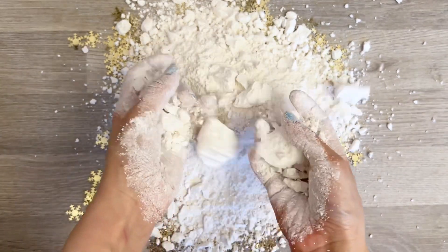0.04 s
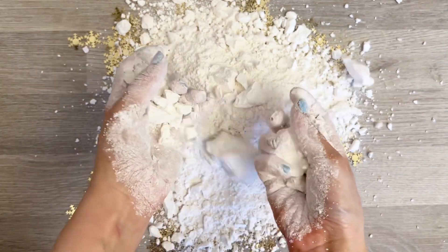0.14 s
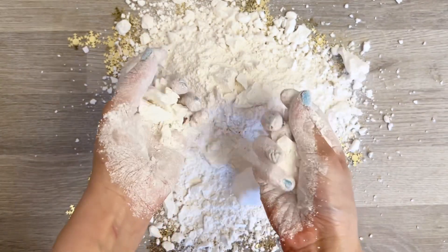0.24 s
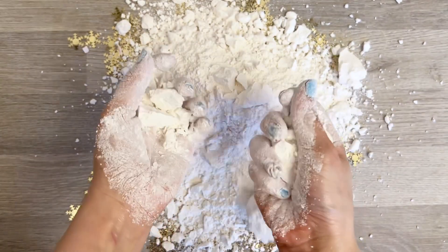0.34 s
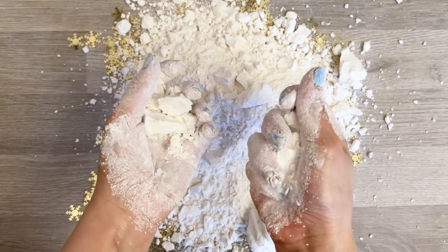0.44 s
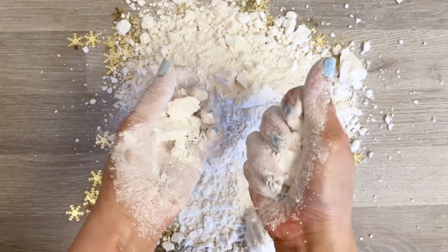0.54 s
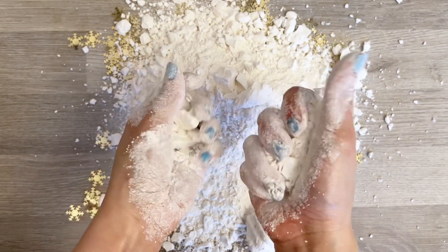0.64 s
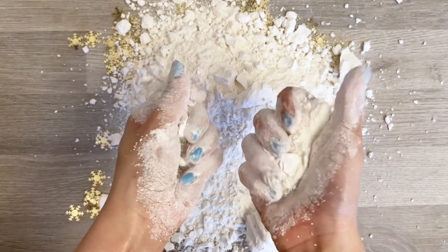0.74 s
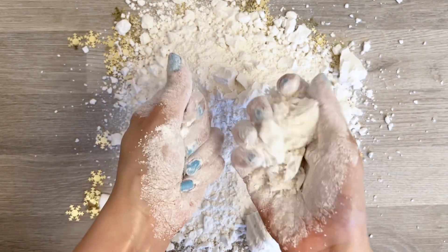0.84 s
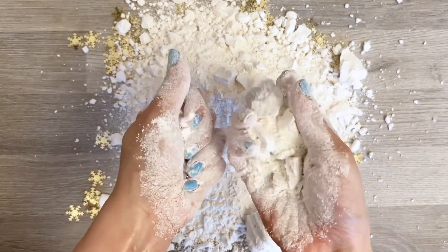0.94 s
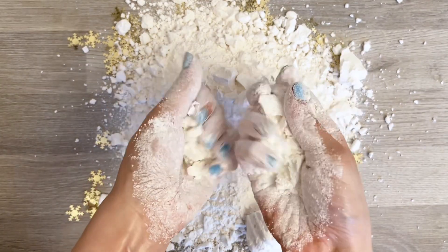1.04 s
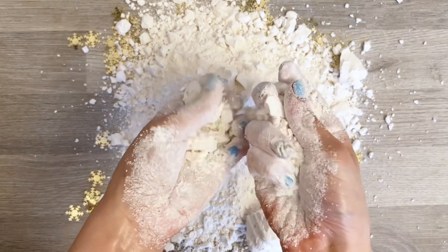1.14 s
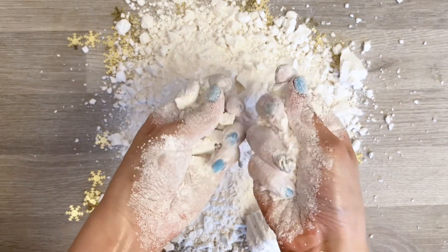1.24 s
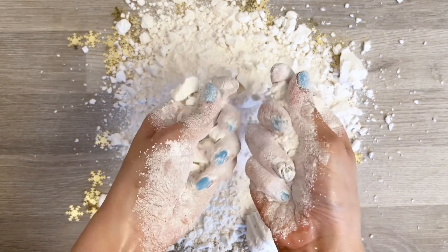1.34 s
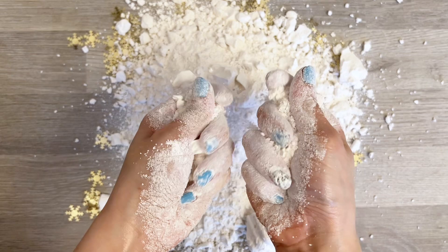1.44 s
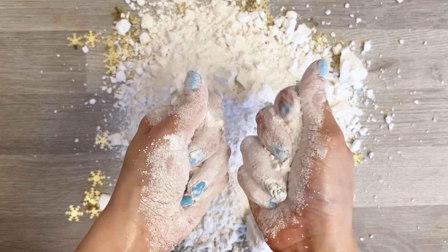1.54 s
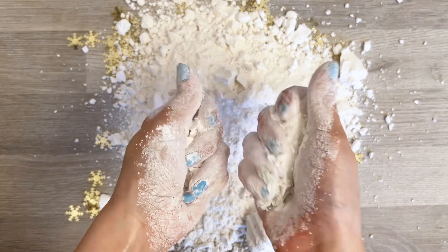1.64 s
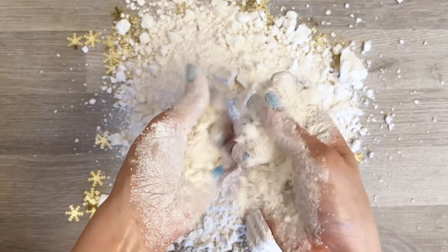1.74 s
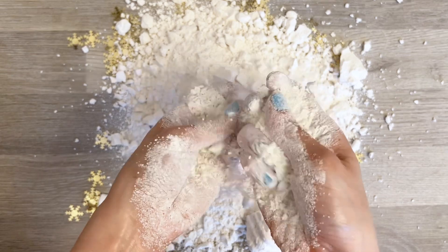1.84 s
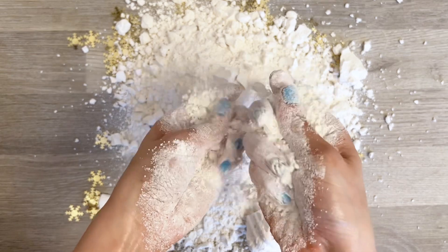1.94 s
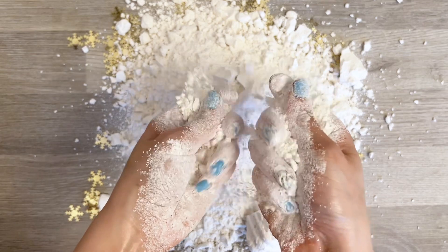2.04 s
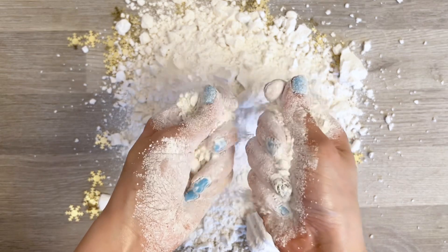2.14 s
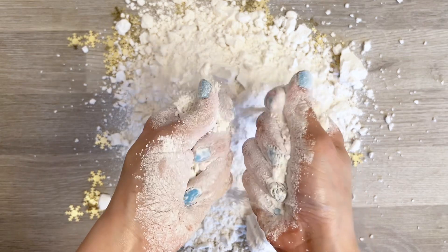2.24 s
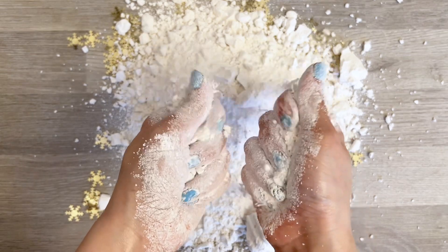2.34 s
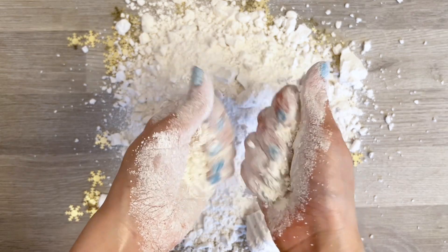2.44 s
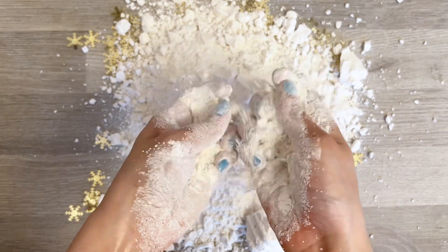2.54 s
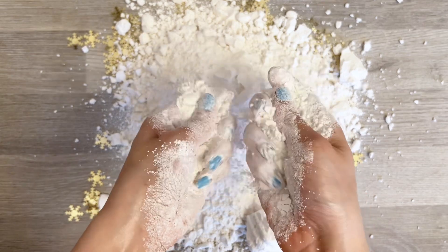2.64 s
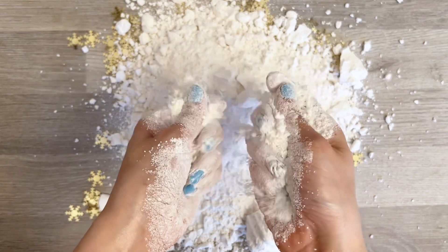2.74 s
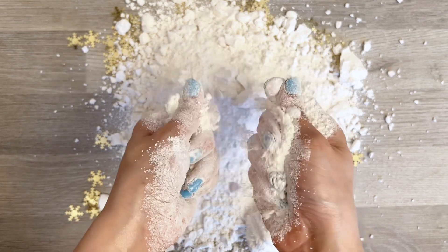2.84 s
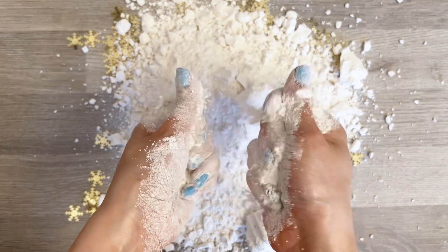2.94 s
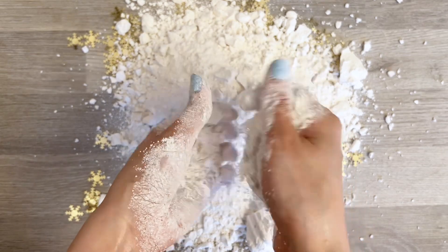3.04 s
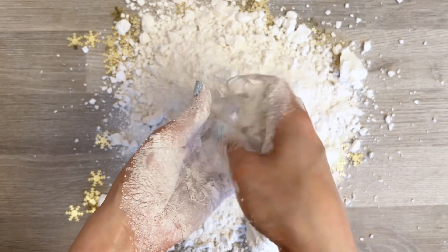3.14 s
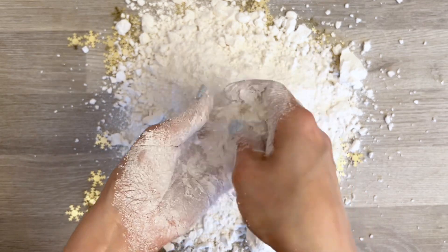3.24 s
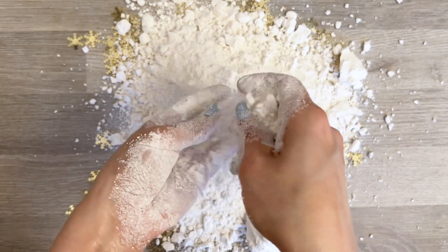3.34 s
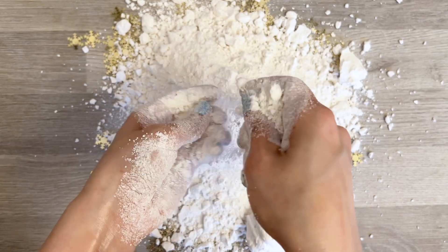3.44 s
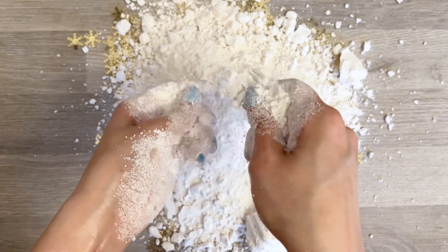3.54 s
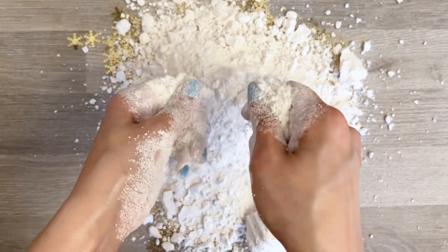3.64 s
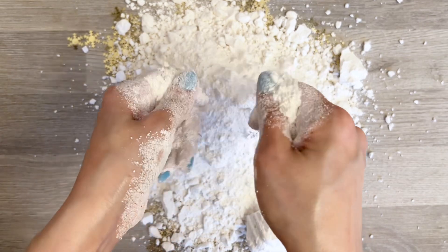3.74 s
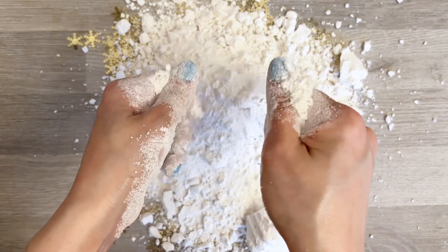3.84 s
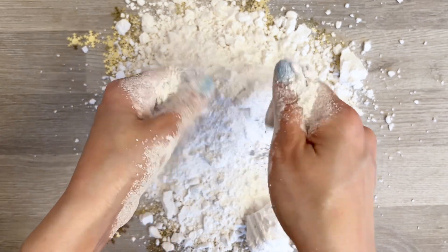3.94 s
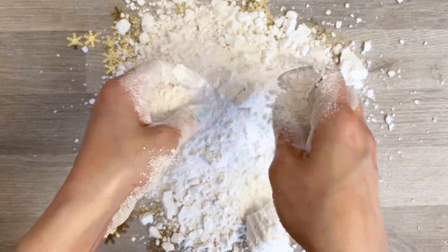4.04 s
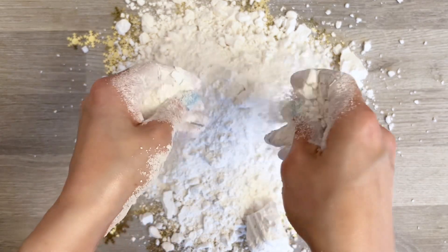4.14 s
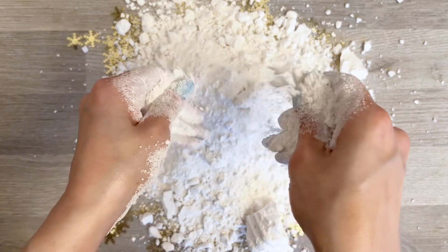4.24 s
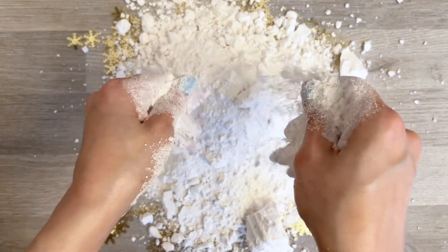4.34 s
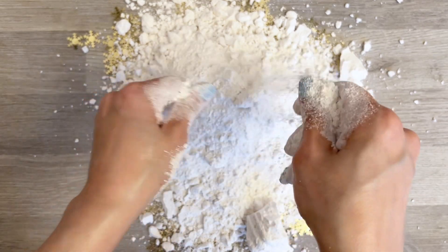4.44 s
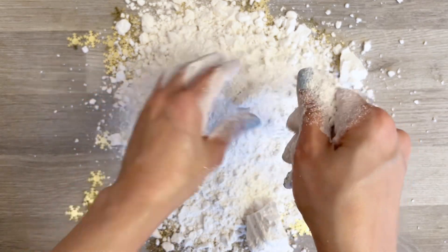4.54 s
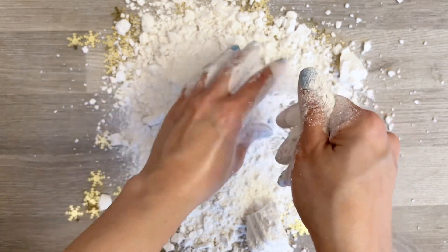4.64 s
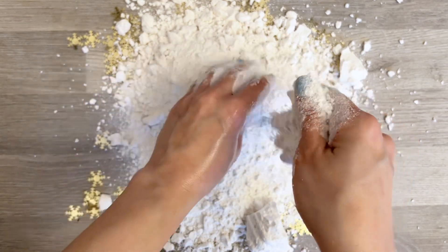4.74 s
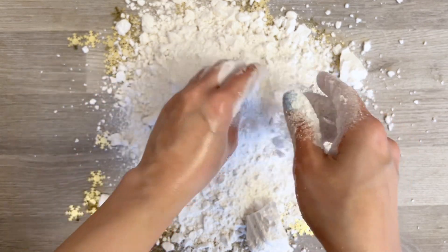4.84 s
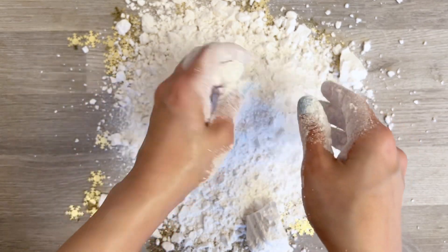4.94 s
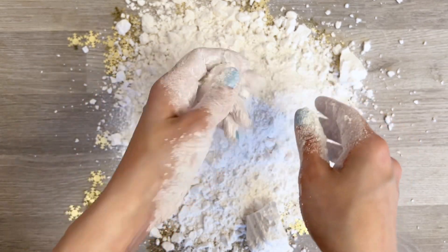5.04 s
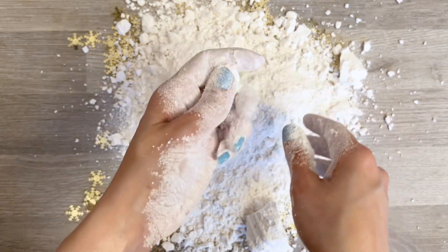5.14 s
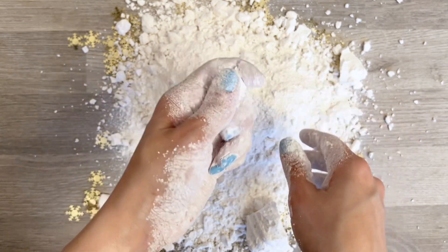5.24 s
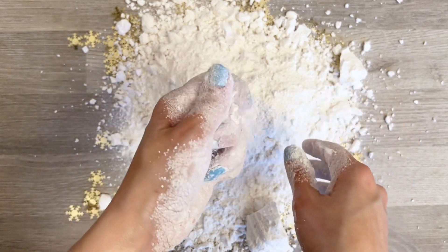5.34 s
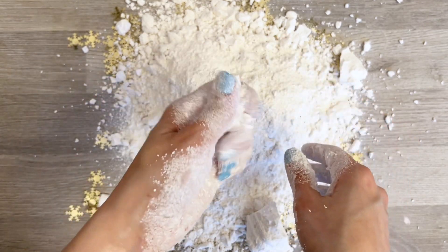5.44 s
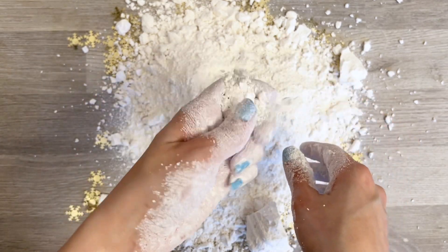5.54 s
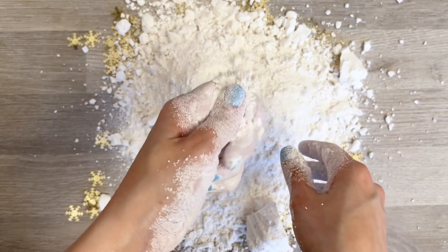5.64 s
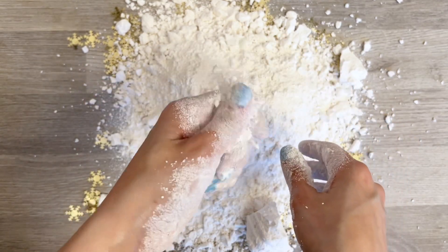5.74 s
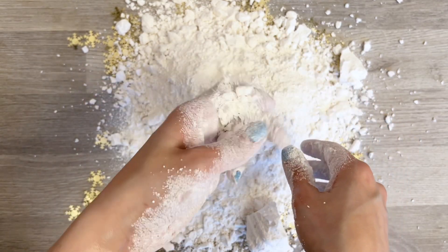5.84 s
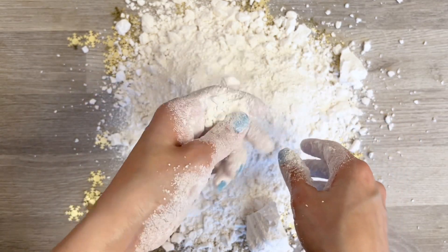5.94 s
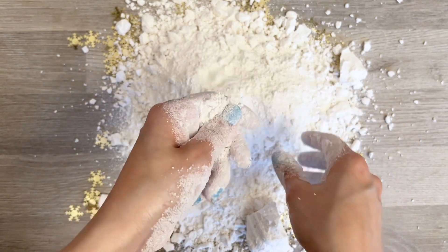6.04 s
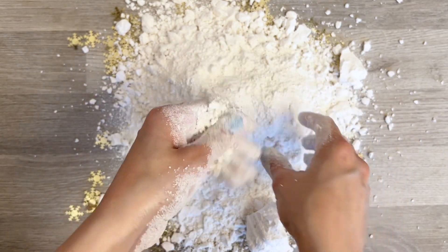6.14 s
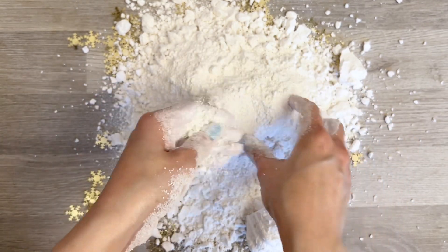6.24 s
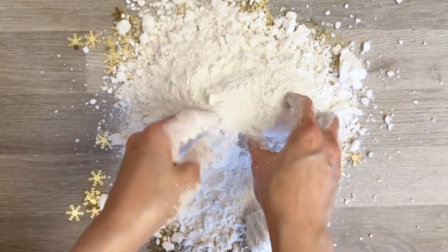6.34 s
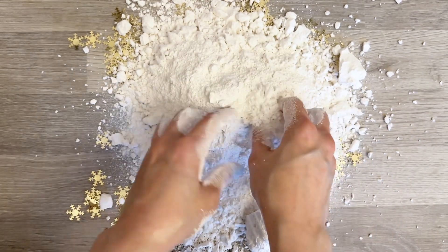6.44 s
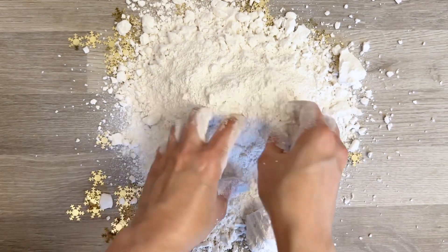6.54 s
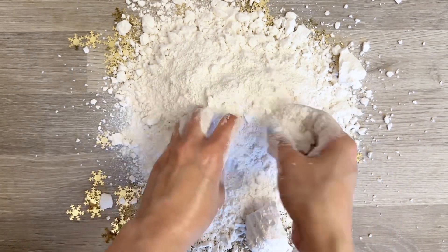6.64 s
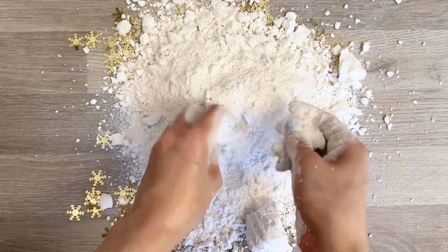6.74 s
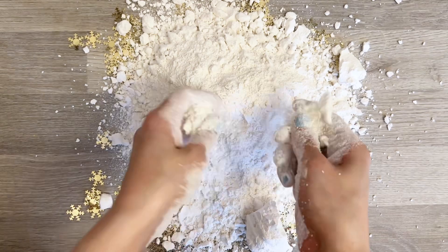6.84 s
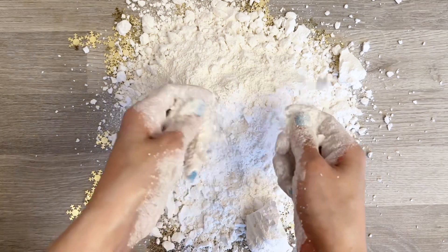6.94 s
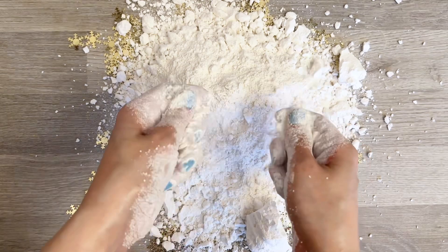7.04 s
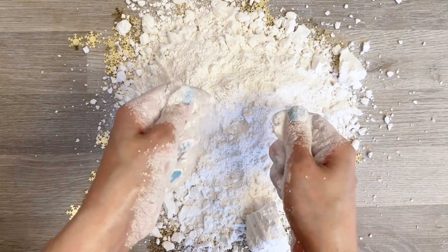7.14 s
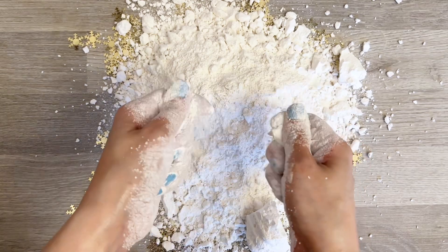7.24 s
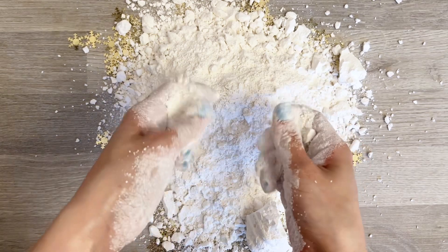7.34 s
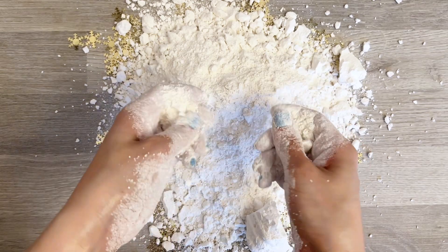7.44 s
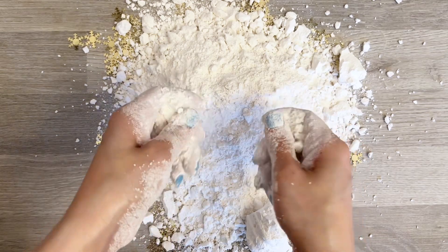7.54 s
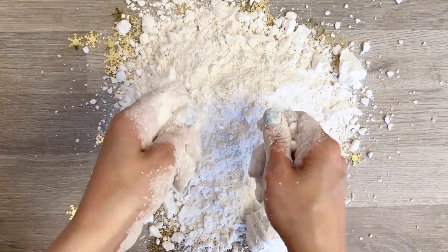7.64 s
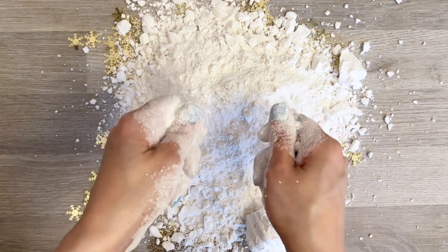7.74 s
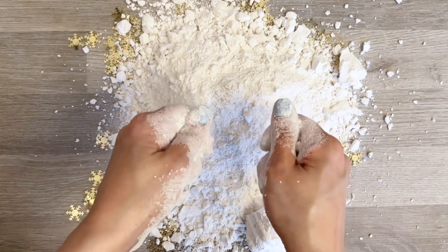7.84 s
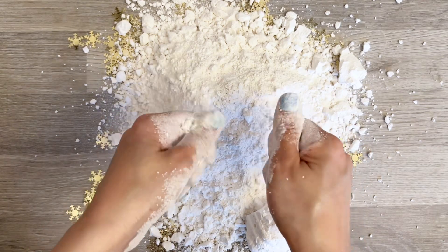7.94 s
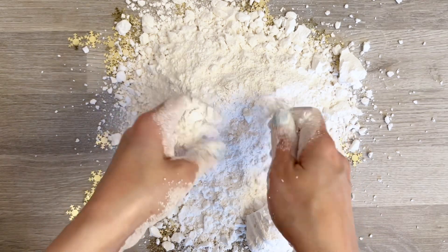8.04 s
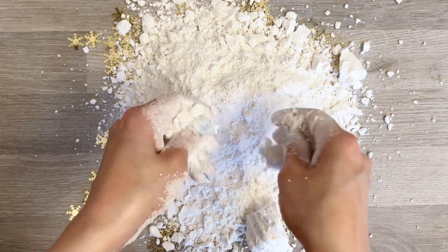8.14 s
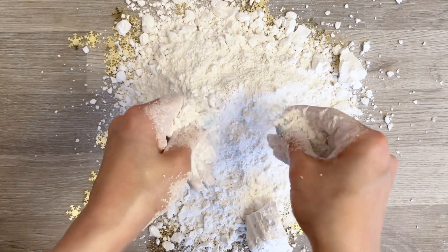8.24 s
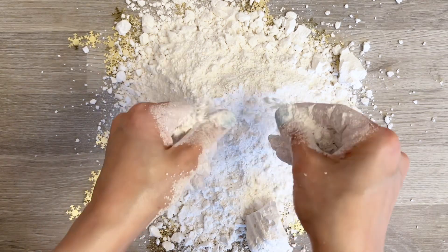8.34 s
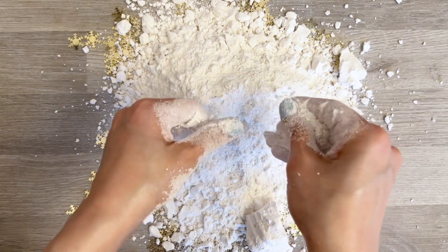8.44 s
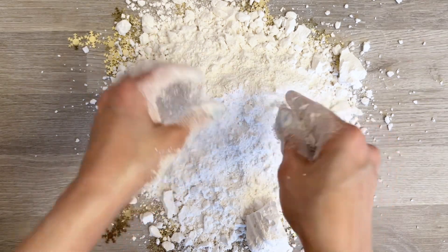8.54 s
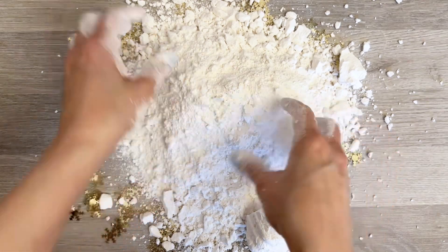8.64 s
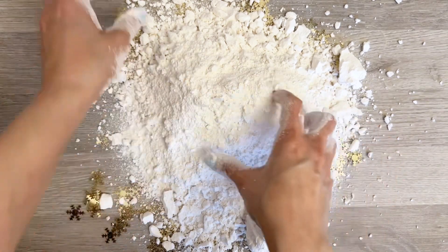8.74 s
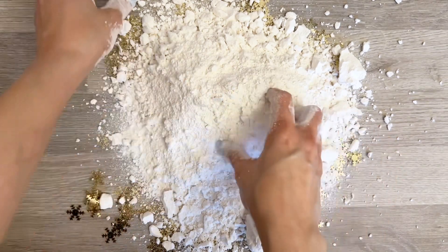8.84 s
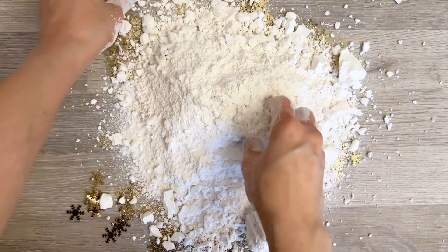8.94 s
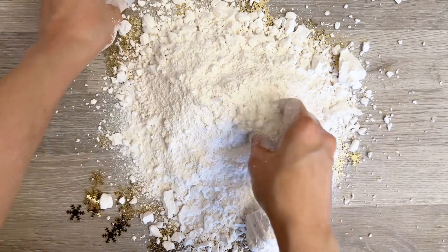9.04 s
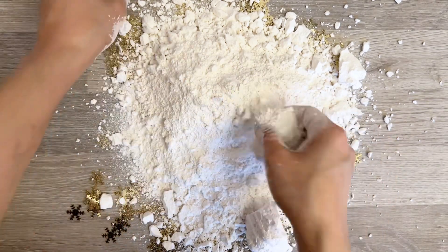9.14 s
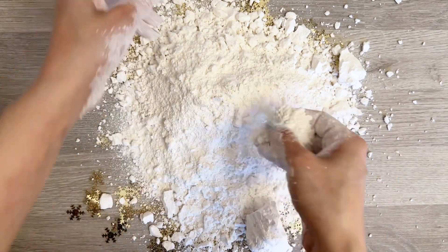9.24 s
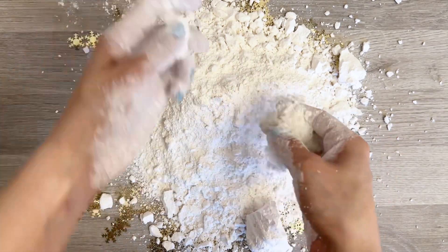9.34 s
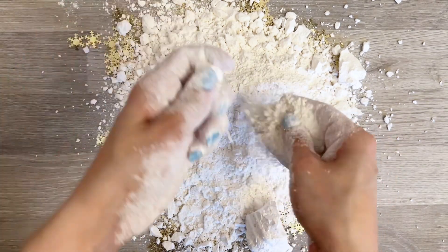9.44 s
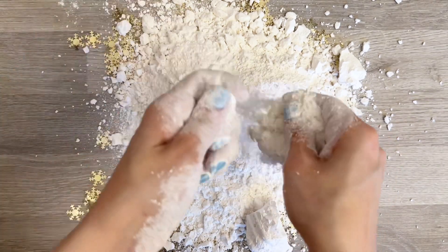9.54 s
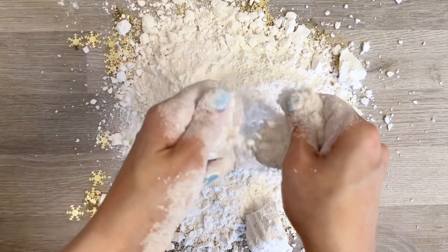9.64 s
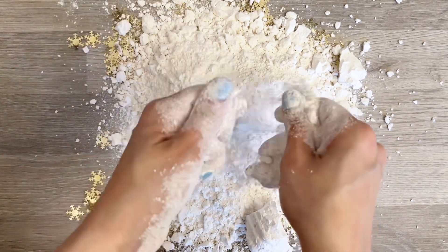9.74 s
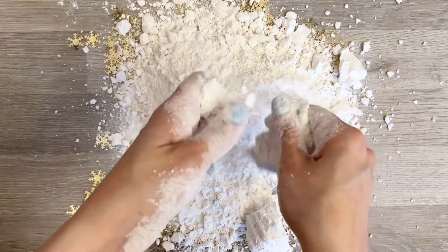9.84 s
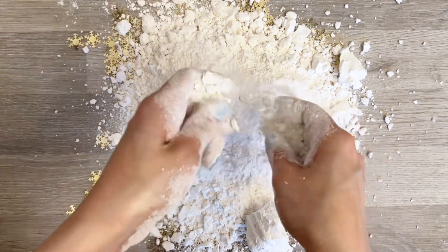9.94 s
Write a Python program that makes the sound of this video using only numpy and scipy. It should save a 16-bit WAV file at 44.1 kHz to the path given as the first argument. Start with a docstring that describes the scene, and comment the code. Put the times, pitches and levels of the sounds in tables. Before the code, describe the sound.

Chalk chunks grind and break inside two fists, heard close and dry with a short room tail. Busy crackles and sifting dust thin out into separate crunches and quiet gaps. One loud snap, fingers digging softly into powder, another loud snap, then a quieter dig and a last group of muffled pops. Low steady air rumble and a barely audible thin whine stay underneath.

```python
"""Two hands crush lumps of gym chalk over a powder heap on a table, close to a stereo microphone in a small room.
From the start fists grind crumbs (resonant grains), sift dust and press powder; lumps snap (noise-trailed pulses),
crumbs pop and bright flakes tick off (damped resonances), over soft table shoves and thuds (low noise, low resonances).
The hardest snaps come at 5.3 s and 7.7 s; fingers dig into the heap at the start, after 6.2 s and near 9 s.
A low ventilation rumble with hiss (shaped noise) and a thin whine (resonant noise) run throughout."""
import sys
import numpy as np
from scipy import signal
from scipy.fft import rfft, irfft
from scipy.io import wavfile
from scipy.ndimage import uniform_filter1d

SR = 44100
rng = np.random.default_rng(int(sys.argv[2]) if len(sys.argv) > 2 else 0)


def log_audio(samples):
    """Write samples as a 16-bit WAV file to the path given in sys.argv[1]."""
    # one column per channel
    frames = np.atleast_2d(samples).T
    # limit to full scale, then quantise
    limited = np.clip(frames, -1, 1)
    pcm = np.round(limited * 32767).astype(np.int16)
    wavfile.write(sys.argv[1], SR, pcm)


N = 440113
TIME = np.arange(N) / SR
FFT_SIZE = 466560
FREQS = np.fft.rfftfreq(FFT_SIZE, 1 / SR)

# Lumps snapping. Each row: start in s, level in dB, hollow body in dB re level, bright edge in dB re level;
# snaps() adds a fixed trim to each part.
SNAP_EVENTS = [(0.1, -14, -17, -15), (0.172, -14.5, -9.5, -20), (0.3857, -15.5, -12.5, -25),
               (.41, -15.5, -9, -21), (0.416, -12.5, -11, -11.5), (0.459, -11, -10.5, -27),
               (.591, -19.5, -6, -38), (.671, -16, -16, -24), (1.073, -23, -1, -15),
               (1.191, -19.5, -15, -26), (1.2192, -16.5, -7.5, -12.5), (1.27, -14.5, -8.5, -17),
               (1.46, -21, -3, -17), (1.498, -18, -19, -36), (1.948, -22, -19, -24),
               (2.216, -19.5, -25, -33), (3.07, -29.5, -11.5, -21), (3.602, -20.5, -7, -22.5),
               (3.636, -28.5, 5, -8), (4.305, -17.5, -7.5, -34), (4.324, -22, -5.5, -14),
               (4.557, -16, -11.5, -13.5), (5.19, -27.5, -14, -20), (5.302, -2.5, -12.5, -19),
               (5.984, -29.5, -1, -5), (6.008, -18.5, -1.5, -12), (6.75, -22, -28, -21),
               (6.813, -20, -12, -11.5), (6.834, -23.5, -11, -18), (7.0055, -16.5, -31, -25),
               (7.051, -16.5, -29, -37), (7.586, -16, -8, -13.5), (7.616, -21.5, -7.5, -26),
               (7.695, -2.5, -23, -27), (7.721, -21, -14, -25), (7.769, -21.5, -13, -17),
               (7.796, -24.5, -13, -12), (8.272, -27, -22, -14), (9.434, -24, -7.5, -9),
               (9.449, -22, -14, -9), (9.5715, -20, -6, -12), (9.977, -17.5, -8.5, -11.5)]


def from_db(db):
    """Decibels to amplitude gain."""
    return 10 ** (np.asarray(db) / 20)


def rms_one(x):
    """Scale to unit rms."""
    return x / np.sqrt(np.mean(x ** 2) + 1e-20)


def at_freqs(points):
    """Interpolate (Hz, value) points over log frequency."""
    hz, value = np.transpose(points)
    return np.interp(np.log(FREQS + 1), np.log(hz), value)


def filtered(x, response):
    """Apply a frequency response."""
    return irfft(rfft(x, FFT_SIZE) * response)[..., :N]


def coloured(x, spectrum):
    """Minimum-phase filter following (Hz, dB) points: no ringing ahead of an event."""
    cepstrum = irfft(np.log(from_db(at_freqs(spectrum))))
    # fold the cepstrum onto positive time
    cepstrum[1:FFT_SIZE // 2] *= 2
    cepstrum[FFT_SIZE // 2 + 1:] = 0
    return filtered(x, np.exp(rfft(cepstrum)))


def band(x, low_hz, high_hz):
    """Gentle Butterworth band-pass."""
    sos = signal.butter(2, [low_hz, min(high_hz, SR / 2 - 1)], "band", fs=SR, output="sos")
    return signal.sosfilt(sos, x)


def resonate(x, hz, width_hz):
    """Two-pole resonance with gain near 1 at its peak."""
    r = np.exp(-np.pi * width_hz / SR)
    zeros = np.array([1, 0, -1]) * (1 - r * r) / 2
    poles = [1, -2 * r * np.cos(2 * np.pi * hz / SR), r * r]
    return signal.lfilter(zeros, poles, x)


def resonate_twice(x, hz, first_width_hz, second_width_hz):
    """Two resonances in series at one pitch: softer onset, steeper skirts."""
    return resonate(resonate(x, hz, first_width_hz), hz, second_width_hz)


def drift(per_s):
    """Random curve: normal draws at per_s points a second, joined by straight lines."""
    return np.interp(TIME * per_s, np.arange(N), rng.standard_normal(N))


def snaps(lead_s=0.0011, run_s=0.0033, run_db=0.0, debris_s=0.011, debris_db=-26,
          core_db=-2.5, body_db=-6.5, edge_db=-1, size=3000):
    """A crack creeps in, parts the lump with one sharp pulse, runs on for a moment and sheds debris."""
    # Hollows of the cupped hands. Each row: resonance in Hz, width in Hz, gain in dB.
    hollows = [(1410, 960, 15), (2180, 940, 13.5), (2680, 440, 14), (4570, 13000, -18)]
    # Colour of the bright edge. Each row: frequency in Hz, gain in dB.
    edge_colour = [(2500, -66), (5000, -6.5), (7500, -1), (10500, -3), (12000, -4), (16000, -46)]
    before_s, delay_s = 0.005, 0.0012   # room for the lead-in; main pulse after the row's start
    t = np.arange(size) / SR - before_s
    main = signal.unit_impulse(size, np.argmin(np.abs(t)))
    running = np.exp(-np.abs(t) / np.where(t < 0, lead_s, run_s))
    crumbling = (t > 0) * np.exp(-np.abs(t) / debris_s)

    def in_hand(x):
        # the hand has a slightly different shape at every snap
        detuned = [(hz * np.exp(0.049 * rng.standard_normal()), width, db) for hz, width, db in hollows]
        return sum(resonate(x, hz, width) * from_db(db) for hz, width, db in detuned)

    def burst(x):
        # unit rms if spread over 4 ms
        return x / np.linalg.norm(x) * np.sqrt(0.004 * SR)

    knocks, edges = np.zeros((2, N + size))
    for s, level_db, hollow_db, bright_db in SNAP_EVENTS:
        splinters = rng.standard_normal((4, size))
        splinters *= np.abs(splinters)   # a few large ones among many small
        cracks = splinters[:3] * running
        core, body, edge = [main + from_db(run_db) * x / np.linalg.norm(x) for x in cracks]
        core = band(in_hand(core), 1740, 6500)
        knock = from_db(core_db) * core / np.abs(core).max()
        knock += from_db(hollow_db + body_db) * burst(band(body, 737, 1490))
        knock += from_db(debris_db) * burst(in_hand(splinters[3] * crumbling))
        at = round((s + delay_s - before_s) * SR)
        knocks[at:at + size] += from_db(level_db) * knock
        edge = band(edge, 3600, 13500)
        edges[at:at + size] += from_db(level_db + bright_db + edge_db) * burst(edge)
    return knocks[:N] + coloured(edges, edge_colour)[:N]


def chips(width_hz=1700, overtone=1.72, overtone_db=-13, size=600):
    """A flake rings for a few cycles at a pitch set by its size, with one fainter overtone."""
    # Hard flakes splitting off. Each row: start in s, pitch in Hz, peak in dB.
    flakes = [(0.4588, 4900, -10), (1.137, 7600, -18), (5.303, 8500, -4.5), (7.696, 6200, -5),
              (9.2681, 8580, -20)]
    out, click = np.zeros(N), signal.unit_impulse(size)
    for s, hz, peak_db in flakes:
        tick = resonate_twice(click, hz, 2 * width_hz, 2 * width_hz)
        upper = resonate_twice(click, overtone * hz, 2 * width_hz, 2 * width_hz)
        tick = tick + from_db(overtone_db) * upper
        out += np.pad(from_db(peak_db) * tick / np.abs(tick).max(), (round(s * SR), N))[:N]
    return out


def pops(rows, sharpness=1.16, after_db=-3, after_s=0.0022, level_db=-2.0, size=2000):
    """A crumb bursts inside the fist: a break and a ragged run of smaller ones, muffled to a pitch set by its size."""
    out = np.zeros(N + size)
    dying = np.exp(-np.arange(size) / SR / after_s)
    for s, hz, row_db in rows:
        run = rng.standard_normal(size)
        run *= np.abs(run) * dying
        breaks = signal.unit_impulse(size) + from_db(after_db) * run / np.linalg.norm(run)
        pop = resonate_twice(breaks, hz, hz / sharpness, hz / sharpness)
        at = round(s * SR)
        out[at:at + size] += from_db(row_db + level_db) * pop / np.abs(pop).max()
    return out[:N]


def stray_pops(grip, per_s=22, level_db=-3.0, follows=0.61, spread_db=3.0, pitch_hz=1750, spread_octaves=0.38):
    """Small crumbs give way at random, louder under a hard grip: rows of start s, pitch Hz, level dB for pops()."""
    chance = rng.standard_normal((400, 2))
    times = np.cumsum(rng.exponential(1, len(chance))) / per_s
    rows = []
    for s, (pitch, strength) in zip(times, chance):
        if s < TIME[-1]:
            grip_db = 20 * np.log10(grip[int(s * SR)])
            row_db = level_db + follows * grip_db + spread_db * strength
            rows.append((s, pitch_hz * 2 ** (spread_octaves * pitch), row_db))
    return rows


def stroke(at_s, build_s, release_s, shape=2.19):
    """Pressure builds to 1 and lets go; 1/e after the build or release time; shape 1 is pointed, 2 rounded."""
    near = slice(*np.searchsorted(TIME, [at_s - 6 * build_s, at_s + 6 * release_s]))
    t, swell = TIME[near] - at_s, np.zeros(N)
    swell[near] = np.exp(-np.maximum(-t / build_s, t / release_s) ** shape)
    return swell


def handwork():
    """Gains over time of large- and small-hollow crumbs, dust, powder and scrape; strokes add in power."""
    # A fist closes on chalk. Each row: hardest grip in s, build in s, release in s, crumbs in dB, dust in dB,
    # powder in dB, tightness as small hollow in dB re large. squeezing() trims dust and powder.
    grips = [(.08, 0.25, 0.4, -51.5, -42, -43, -18), (.25, 0.021, 0.094, -42.5, -58.5, -66, 13),
             (.44, 0.041, 0.053, -44.5, -44, -38, 1), (0.609, 0.27, 0.12, -43, -45, -46, 7),
             (.88, 0.16, 0.18, -46, -45.5, -53.5, -13), (1.07, 0.064, 0.04, -39, -47.5, -48.5, 4),
             (1.26, 0.12, 0.16, -41, -43, -45.5, 0), (1.49, 0.16, 0.1, -38.5, -41.5, -43, -6.5),
             (1.76, 0.22, 0.046, -47.5, -52, -57, 2), (1.94, 0.11, 0.33, -40, -46.5, -43.5, -1),
             (2.07, 0.15, 0.19, -41, -60, -45, -18), (2.331, 0.18, 0.053, -44, -45.5, -59, -7),
             (2.499, 0.16, 0.13, -45.5, -48.5, -64, 2), (2.66, 0.078, 0.25, -42, -50, -51.5, -4),
             (2.701, 0.013, 0.03, -39, -61, -44, 0), (2.89, 0.05, 0.085, -46.5, -45, -52.5, -6),
             (3.3, 0.073, 0.075, -45, -53.5, -52.5, -3), (3.44, 0.077, 0.14, -46.5, -56.5, -50.5, -4),
             (3.668, 0.073, 0.061, -43.5, -49, -40, -3), (3.82, 0.14, 0.068, -46.5, -49, -61, -2),
             (4.2, 0.11, 0.12, -45, -52, -55, -0.5), (4.44, 0.062, 0.11, -53, -51, -59, 20),
             (4.564, 0.0065, 0.026, -46, -43, -45, 5), (5.278, 0.025, 0.081, -44, -49.5, -44.5, 18),
             (5.634, 0.049, 0.074, -39.5, -49, -54, 5), (5.78, 0.014, 0.013, -50, -59, -70, 22),
             (5.995, 0.053, 0.065, -40.5, -51, -48.5, 24), (6.824, 0.019, 0.015, -38, -43, -59, 6),
             (6.8, 0.16, 0.22, -51, -54, -60, 21), (7.02, 0.022, 0.051, -42, -58, -43, 4),
             (7.15, 0.28, 0.15, -48, -59, -70, -3), (7.585, 0.023, 0.034, -39.5, -46, -43.5, 4),
             (7.76, 0.24, 0.25, -50.5, -50, -58, 6), (8.18, 0.051, 0.14, -48, -52.5, -63, 6),
             (8.328, 0.024, 0.091, -48, -49, -54.5, 2), (9.445, 0.063, 0.21, -45.5, -46.5, -59, 5),
             (9.622, 0.052, 0.037, -40.5, -44, -46, -5), (9.8, 0.17, 0.092, -49, -48.5, -70, 11)]
    # Fingers dig into the heap. Each row: deepest push in s, build in s, release in s, powder in dB, scrape in dB.
    pushes = [(.09, .05, 0.05, -46, -46.5), (6.262, .016, 0.041, -48, -50), (6.374, .07, 0.071, -40, -48),
              (6.475, 0.037, 0.056, -50, -51), (6.665, 0.062, 0.039, -46, -48),
              (8.95, 0.12, 0.077, -42.5, -50.5), (8.987, 0.023, 0.021, -45, -39.5)]
    # Loosened fingers let dust trickle. Each row: middle in s, half length to 1/e in s, dust in dB.
    dribbles = [(3.093, 0.3, -56), (3.985, 0.043, -45.5), (4.925, 0.035, -49.5), (5.475, 0.025, -48.5),
                (5.812, 0.25, -53), (6.164, 0.012, -51.5), (7.321, 0.051, -50.5), (8.5, 0.041, -47),
                (8.989, 0.028, -43.5)]
    # chalky hands are never quite still
    rest_crumbs_db, rest_dust_db, rest_powder_db = -69.5, -62, -62.5
    # every snap spills dust: dB at a 0 dB snap, dB per dB of snap level
    spill_db, spill_growth, spill_rise_s, spill_s = -50, 0.2, 0.004, 0.048

    rest_db = (rest_crumbs_db, rest_crumbs_db, rest_dust_db, rest_powder_db, -np.inf)
    large, small, dust, powder, scrape = [np.full(N, from_db(db) ** 2) for db in rest_db]
    for s, build_s, release_s, crumbs_db, dust_db, powder_db, tight_db in grips:
        effort = stroke(s, build_s, release_s) ** 2
        open_share = 1 / (1 + from_db(tight_db) ** 2)
        large += effort * (from_db(crumbs_db) ** 2 * open_share)
        small += effort * (from_db(crumbs_db) ** 2 * (1 - open_share))
        dust += effort * from_db(dust_db) ** 2
        powder += effort * from_db(powder_db) ** 2
    for s, build_s, release_s, powder_db, scrape_db in pushes:
        effort = stroke(s, build_s, release_s) ** 2
        powder += effort * from_db(powder_db) ** 2
        scrape += effort * from_db(scrape_db) ** 2
    for s, length_s, dust_db in dribbles:
        dust += (from_db(dust_db) * stroke(s, length_s, length_s)) ** 2
    for s, level_db, _, _ in SNAP_EVENTS:
        spill = stroke(s + spill_rise_s, spill_rise_s, spill_s)
        dust += (from_db(spill_db + spill_growth * level_db) * spill) ** 2
    return np.sqrt([large, small, dust, powder, scrape])


def avalanches(per_s=80, size_db=6, die_s=0.0022):
    """Now and then a crumb collapses and sets off a short run of larger fractures: a gain over time."""
    sizes = from_db(size_db * np.minimum(rng.exponential(1, N), 1.8))
    starts = (rng.random(N) < per_s / SR) * sizes
    return 1 + signal.lfilter([1], [1, -np.exp(-1 / (die_s * SR))], starts)


def grains(per_s, spread_db, surge, sharpness, low_hz, high_hz, count=9):
    """Tiny fractures, each a short ring at one of count pitches; the slow level is evened out."""
    born = rng.random(N) < per_s / SR
    sizes = from_db(spread_db * np.minimum(rng.exponential(1, N), 4))
    clicks = born * surge * sizes * rng.choice([-1, 1], N)
    dealt = rng.integers(0, count, N)
    faint = 1e-9 * rng.standard_normal(N)   # keeps the filters from pure silence
    pitches = np.geomspace(low_hz, min(high_hz, SR / 2 - 1), count)
    out = sum(resonate(clicks * (dealt == k) + faint, hz, hz / sharpness) for k, hz in enumerate(pitches))
    return out / np.sqrt(np.abs(uniform_filter1d(out ** 2, size=3600)) + 1e-12)


def two_hands(stream, spectrum, apart_db=3, count=0):
    """Each hand makes its own grains, louder by apart_db and count samples earlier on its own side; rms 1."""
    one = coloured(stream, spectrum)
    one = np.array([one, np.roll(one, count)]) * from_db(apart_db * np.array([[1], [-1]]) / 2)
    other = np.roll(one, N // 2, axis=1)[::-1]   # half the length away, sides swapped
    return rms_one(one + other)


def squeezing(loose, tight, sifting, pressing, scraping, fits_per_s=35, fits_db=2.5):
    """Crumbs grind in the fists, dust sifts out, and the heap gives way under the fingers."""
    # Grain colours. Each row: frequency in Hz, relative density in dB per Hz.
    crumb_colour = [(150, -45), (400, -4.5), (720, -9), (1000, 0), (1900, -6.5), (2600, -5), (3400, -11),
                    (6000, -20.5), (9000, -20), (16000, -67)]
    dust_colour = [(600, -48), (2000, 9.5), (3500, 4.5), (8500, 1), (10500, -6), (15800, -4), (16500, -36)]
    powder_colour = [(50, -26), (110, -3.5), (200, -4), (450, -5), (750, -11.5), (1300, -36), (3000, -39),
                     (8000, -66)]
    scrape_colour = [(300, -8), (600, 1), (1100, 2), (1800, -5), (3000, -12), (6000, -29)]
    surge = avalanches()
    coarse = grains(per_s=1100, spread_db=3.5, surge=surge, sharpness=1.7, low_hz=578, high_hz=3180, count=6)
    coarse = two_hands(coarse, crumb_colour, count=2)
    # a closing fist shrinks its hollow and grinds finer, so the crunch gets denser and moves up in pitch
    fine = grains(per_s=1900, spread_db=2.5, surge=surge ** 0.88, sharpness=1.6, low_hz=1140, high_hz=6100, count=5)
    fine = two_hands(fine, crumb_colour, count=2)
    large = rms_one(band(coarse, 225, 1640))
    small = rms_one(band(fine, 1500, 8700))
    # chalk gives way in fits and starts
    crumbs = (loose * large - tight * small) * from_db(fits_db * drift(fits_per_s))
    dust = grains(per_s=5000, spread_db=1.0, surge=surge ** 0.84, sharpness=2.5, low_hz=2030, high_hz=13800)
    dust = two_hands(dust, dust_colour)
    powder = grains(per_s=700, spread_db=4.5, surge=np.sqrt(surge), sharpness=2.1, low_hz=81.7, high_hz=1950)
    powder = two_hands(powder, powder_colour, count=6)
    # loose crumbs slide under the digging fingers without breaking, so they rub evenly
    scrape = grains(per_s=2700, spread_db=5.0, surge=1, sharpness=3.1, low_hz=420, high_hz=2960)
    scrape = two_hands(scrape, scrape_colour, count=4)
    return crumbs + from_db(-2.5) * sifting * dust + from_db(-0.5) * pressing * powder + scraping * scrape


def thuds(width_hz=60):
    """Lumps and knuckles bump the table, cushioned by powder: one low, quickly damped resonance each."""
    # Each row: start in s, pitch in Hz, peak in dB.
    bumps = [(0.253, 97, -31), (0.596, 147, -32), (1.003, 287, -37), (1.225, 160, -34.5),
             (3.658, 214, -33.5), (4.897, 237, -37)]
    out = np.zeros(N)
    for s, hz, peak_db in bumps:
        knock = resonate_twice(signal.unit_impulse(SR // 10), hz, 2 * width_hz, width_hz)
        out += np.pad(from_db(peak_db) * knock / np.abs(knock).max(), (round(s * SR), N))[:N]
    return out


def table():
    """The table top answers each soft shove with a deep rumble: low noise under bell-shaped swells."""
    # Each row: middle in s, level in dB, standard deviation of the swell in s.
    pushes = [(0.164, -44, 0.089), (0.29, -45, 0.04), (0.486, -39, 0.011), (6.777, -44.5, 0.028),
              (6.88, -49.5, 0.037), (9.256, -45.5, 0.054), (9.934, -48, 0.031)]
    # Each row: frequency in Hz, relative density in dB per Hz.
    colour = [(22, -20), (55, -9.5), (90, -5), (140, -35), (400, -67)]
    shove = sum(from_db(db) * np.exp(-((TIME - s) / length_s) ** 2 / 2) for s, db, length_s in pushes)
    return shove * rms_one(coloured(rng.standard_normal(N), colour))


def whine(pitches_hz=(6460, 7120), width_hz=70, level_db=-75):
    """A faint, thin whine: noise through two narrow resonances."""
    tones = [resonate_twice(rng.standard_normal(N), hz, width_hz, width_hz) for hz in pitches_hz]
    return from_db(level_db) * rms_one(sum(tones))


def microphones(x):
    """The two ports hear the near sound with a lag and a level that depend on frequency."""
    # Each row: frequency in Hz, phase by which left leads in radians.
    lead = [(0, 0), (1700, .6), (3000, 1.7), (4500, .7), (8400, 0), (10300, -3.1), (16500, -13)]
    # Each row: frequency in Hz, left minus right in dB.
    balance = [(60, 2), (500, 1), (1400, 3.5), (2600, 1.1), (5000, 7.5), (8500, 2.5), (13000, -2)]
    phase = np.interp(FREQS, *np.transpose(lead))
    left = from_db(at_freqs(balance) / 2)
    return filtered(x, np.array([left, np.exp(-1j * phase) / left]))


def room(x, early_db=-13, early_s=0.011, tail_db=-12, t60_s=0.22, size=22000, count=2):
    """Quick scatter from hands and table, then the room's short tail; the paths change as the hands move."""
    t = np.arange(size) / SR
    walls = from_db(at_freqs([(100, -0.5), (700, 2), (2400, -3.5), (4000, -2.5), (7000, 6.0), (14000, -23.0)]))
    place = np.abs([drift(4) for _ in range(count)])
    out = 0
    for share in place / np.linalg.norm(place, axis=0):
        scatter, tail = rng.standard_normal((2, 2, size))
        scatter = scatter * (t > 0.0007) * np.exp(-t / early_s)
        tail = tail * (t > 0.006) * from_db(-60 * t / t60_s)
        parts = [(early_db, scatter), (tail_db, tail)]
        echo = sum(from_db(db) * part / np.linalg.norm(part[0]) for db, part in parts)
        out = out + rfft(x * share, FFT_SIZE) * rfft(echo, FFT_SIZE)
    return irfft(out * walls)[:, :N]


def room_air(air_db=-54.0, apart_hz=500):
    """Steady ventilation rumble and hiss: shaped noise, alike in both channels in the bass only."""
    # Each row: frequency in Hz, relative density in dB per Hz.
    colour = [(20, -36), (48, 5), (75, 1.5), (92, 6), (115, -1), (190, -3), (450, -15), (1000, -22.5),
              (2200, -21.5), (3800, -28), (6000, -33), (6800, -21), (10000, -42), (15500, -39),
              (16300, -54)]
    mid, side = coloured(rng.standard_normal((2, N)), colour)
    side = filtered(side, np.sqrt(0.027 + 1.2 * FREQS ** 2 / (FREQS ** 2 + apart_hz ** 2)))
    return from_db(air_db) * (mid + side * [[1], [-1]]) / np.std(mid)


def scene():
    """Chalk close by, the table under it, the room around."""
    # Crumbs bursting inside a fist. Each row: start in s, pitch in Hz, level in dB before the trim in pops().
    crumb_bursts = [(0.0577, 980, -23), (0.2354, 1140, -20.5), (0.2597, 1860, -26), (0.522, 2070, -21),
                    (0.7653, 1390, -20.5), (0.832, 1420, -20), (0.8755, 1410, -24.5), (1.0547, 1570, -23),
                    (1.48, 1400, -20), (1.5241, 1720, -21), (1.543, 1390, -25), (2.2318, 1310, -24),
                    (2.301, 1600, -30), (2.6927, 1090, -23.5), (2.8734, 1730, -23.5), (3.1704, 1670, -33.5),
                    (3.4421, 1070, -25), (3.4713, 950, -19.5), (3.5887, 950, -19), (3.703, 2240, -13.5),
                    (4.141, 2330, -24), (4.188, 2200, -25.5), (4.4241, 1730, -24.5), (4.7652, 3400, -33.5),
                    (5.2056, 2540, -27), (5.286, 1700, -27), (5.546, 880, -35), (5.7173, 2660, -25.5),
                    (5.875, 3580, -31), (5.9213, 2320, -25), (6.002, 1650, -20), (6.0108, 1450, -19.5),
                    (6.34, 1510, -28.5), (6.823, 1400, -30), (7.095, 1390, -27), (7.1304, 1410, -23.5),
                    (7.136, 1370, -27), (7.473, 1400, -31), (7.557, 1730, -23), (7.674, 1700, -19.5),
                    (7.892, 1850, -25.5), (8.253, 1350, -24.5), (9.5925, 1270, -10), (9.6209, 1470, -15),
                    (9.8705, 1690, -32)]
    loose, tight, sifting, pressing, scraping = handwork()
    chalk = snaps() + chips() + squeezing(loose, tight, sifting, pressing, scraping)
    chalk = chalk + pops(crumb_bursts + stray_pops(np.hypot(loose, tight)))
    near = microphones(chalk + table() + thuds() + whine())
    return near + room(chalk.mean(axis=0)) + room_air()


def record(dry, cutoff_hz=16800):
    """Clip at full scale, then cut the top with a steep low-pass."""
    sos = signal.ellip(10, 0.1, 80, cutoff_hz, fs=SR, output="sos")
    return signal.sosfilt(sos, np.clip(dry, -1, 1))


dry = scene()
out = record(dry)
log_audio(out)
```